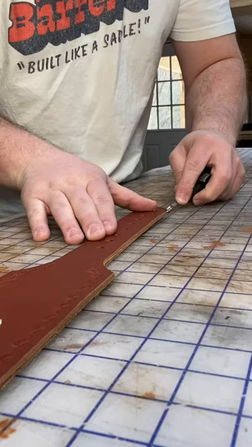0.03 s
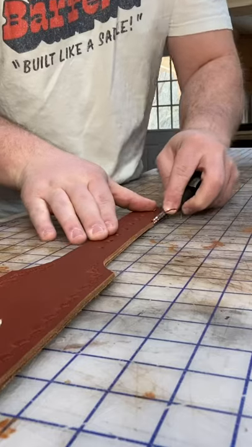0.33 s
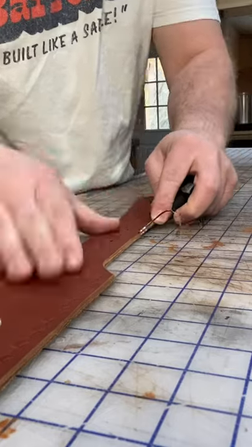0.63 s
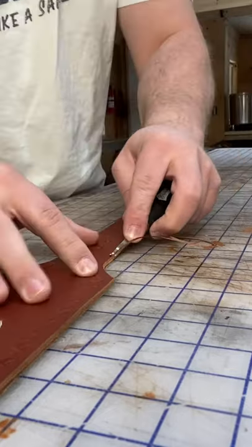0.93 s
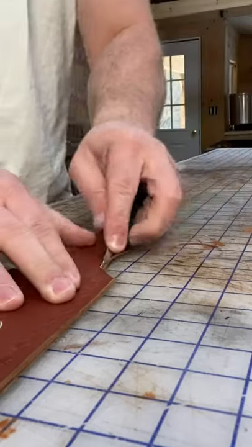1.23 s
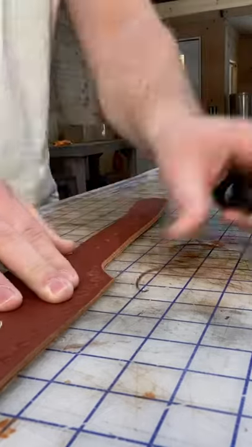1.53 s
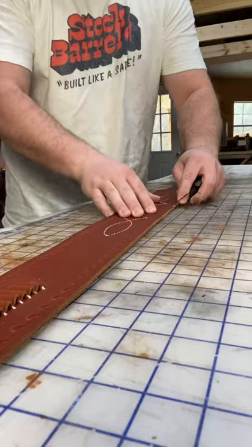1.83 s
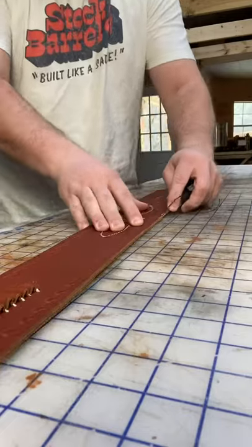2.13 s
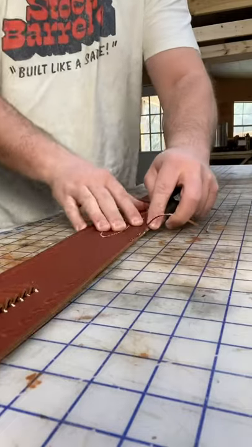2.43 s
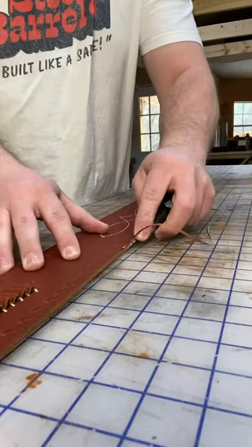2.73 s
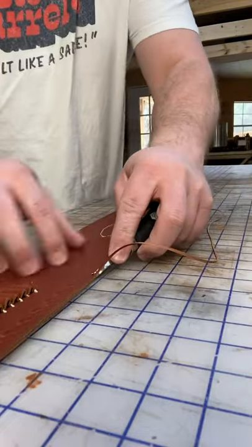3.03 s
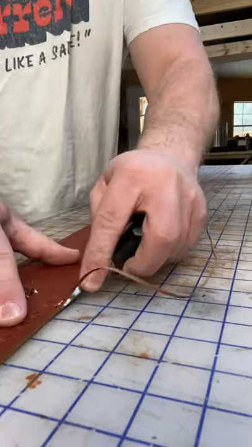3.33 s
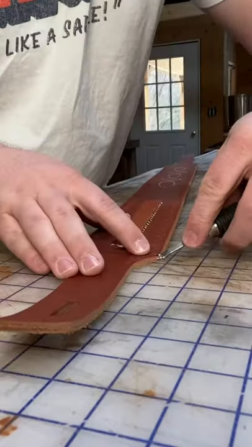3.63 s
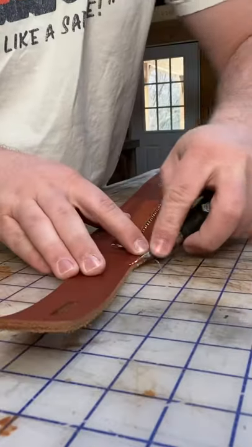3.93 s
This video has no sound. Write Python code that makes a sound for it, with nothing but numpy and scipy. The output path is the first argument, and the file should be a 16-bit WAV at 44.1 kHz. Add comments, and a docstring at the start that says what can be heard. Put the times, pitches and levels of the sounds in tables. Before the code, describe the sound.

A hand tool scrapes along a leather belt's edge in seven dry, hissy strokes. Two run until 1.3 seconds, followed by a sharp tick and a quick brush over leather at 1.6. Five more follow from 1.7 to 4, loudest between 2.5 and 3.5. Soft workbench thuds come around 0.6, 1.4 and from 2 to 3.1 seconds. A low machine hum and faint rush of air lie underneath.

```python
"""Over a low machine hum comes the rasp of an edge beveler, pushed along a leather belt in seven strokes.
The blade parts the fibres in tiny slips, which sound as a rasp with a fine hiss on top and a low rumble
from the workbench. Short pauses to regrip separate the strokes. Hands and tool thud on the bench and
excite its modes, the steel tip ticks, and something brushes quickly over the leather."""
import sys
import numpy as np
from scipy import signal
from scipy.fft import rfft, irfft
from scipy.io import wavfile
from scipy.ndimage import uniform_filter1d

SR = 44100
rng = np.random.default_rng(int(sys.argv[2]) if len(sys.argv) > 2 else 0)


def digitize_waveform(pressure):
    """Quantize a signal to 16-bit integers and store it at the path in sys.argv[1].

    Rows of a 2-D input are taken as channels; values are limited to [-1, 1].
    """
    field = np.atleast_2d(pressure).T
    bounded = np.clip(field, -1, 1)
    quanta = np.round(bounded * 32767).astype(np.int16)
    wavfile.write(sys.argv[1], SR, quanta)


N = 176400
T = np.arange(N) / SR
HZ = np.fft.rfftfreq(N, 1 / SR)

# The envelopes of the seven strokes. Each row: time in seconds, then low rasp, high rasp and hiss in dB.
LEVELS_1 = [(0.04, -54.5, -63.5, -68), (0.268, -53.5, -52.5, -53.5), (0.452, -52.5, -55, -54),
            (0.495, -68, -70, -69), (0.555, -73, -71.5, -63.5), (0.622, -69, -67.5, -73)]
LEVELS_2 = [(0.63, -59, -65.5, -63.5), (0.694, -50.5, -51.5, -51.5), (0.762, -52, -56.5, -51.5),
            (1.035, -52, -58.5, -60), (1.115, -58, -68.5, -69.5), (1.215, -51, -66.5, -67.5),
            (1.346, -47.5, -53, -54)]
LEVELS_3 = [(1.711, -53, -52.5, -56), (1.92, -54, -52.5, -56), (1.965, -63.5, -65.5, -66),
            (2.04, -68, -70, -66)]
LEVELS_4 = [(2.04, -63, -71, -69), (2.078, -52, -53, -55), (2.27, -52.5, -55, -51),
            (2.345, -48, -48.5, -48.5), (2.405, -47.5, -53, -50.5), (2.428, -66.5, -64, -65.5),
            (2.54, -69, -70, -67)]
LEVELS_5 = [(2.545, -58, -77, -77), (2.568, -49, -58.5, -55), (2.61, -48, -52, -47),
            (2.82, -46, -51.5, -51), (2.935, -44, -51, -42.5), (2.975, -61.5, -69, -70),
            (3.072, -97, -77, -65)]
LEVELS_6 = [(3.08, -60, -73, -62), (3.106, -59, -72, -68), (3.12, -47, -60, -57), (3.185, -45, -51, -43.5),
            (3.35, -45.5, -53, -48.5), (3.496, -46, -52, -49)]
LEVELS_7 = [(3.62, -76, -96, -101), (3.645, -56, -66.5, -63), (3.694, -56.5, -59.5, -60.5),
            (3.728, -66, -79, -94), (3.75, -54, -61, -59), (3.84, -53.5, -59, -51.5), (4.0, -52, -60, -59)]


def amp(db):
    """Amplitude ratio of a level in decibels."""
    return 10 ** (np.asarray(db) / 20)


def unit(x):
    """Normalisation to an rms of 1."""
    return x / np.sqrt(np.mean(x ** 2) + 1e-20)


def response(points):
    """Frequency response in dB, interpolated between points on a logarithmic frequency axis."""
    hz, db = np.transpose(points)
    return np.interp(np.log(HZ + 1), np.log(hz), db)


def colour(x, points):
    """Linear filtering: the spectrum is multiplied by a frequency response."""
    return irfft(rfft(x) * amp(response(points)), N)


def drift(shape, *spans):
    """Slow random fluctuation of rms 1: noise averaged over a span of steps along each axis."""
    x = rng.standard_normal(shape)
    for axis, span in enumerate(spans):
        for _ in range(2):
            x = uniform_filter1d(x, max(1, round(span)), axis, mode="wrap")
    return unit(x)


def widen(pair):
    """Partial coherence: independent mid and side signals make left and right differ in the treble."""
    # Each row: frequency in Hz, side relative to mid in dB.
    width = [(100, -49), (300, -20.5), (1200, -26.5), (2200, -19), (3300, -6.5), (5000, -3.5), (7000, -4),
             (9500, -7), (12000, -26), (15500, -58)]
    side = colour(pair[1], width)
    return np.array([pair[0] + side, pair[0] - side])


def machine_hum(waver_depth=.17, waver_s=.05, beat_ratio=1.14, beat_db=-11):
    """Beating: the fundamental of a wavering harmonic series interferes with a weaker tone just above."""
    # Each row: start and end in seconds, fundamental in Hz, level in dB.
    hums = [(.035, 1.707, 89, -58), (1.707, 3.497, 109.1, -57.5), (3.497, 4.0, 89, -58)]
    # Each row: harmonic number, relative level in dB.
    harmonics = [(1, 0.5), (2, -6.5), (4, -10.5), (5, -10.5), (6, -7), (7, -9.5), (9, -15)]
    out = np.zeros(N)
    for ratio, partial_db in harmonics + [(beat_ratio, beat_db)]:
        waver = 1 + waver_depth * (drift(N, waver_s * SR) + 1j * drift(N, waver_s * SR))
        for start, end, hz, db in hums:
            on = (T >= start) & (T < end)
            tone = np.exp(2j * np.pi * (ratio * hz * T[on] + rng.random()))
            out[on] += amp(db + partial_db) * np.sqrt(2) * (waver[on] * tone).real
    return out


def air(level_db=-58.5):
    """Stationary noise: a soft rush of air with most of its power at low frequencies."""
    # Each row: frequency in Hz, relative spectral density in dB.
    spectrum = [(25, -49), (50, -19), (75, -16.5), (110, 2.5), (170, -2.5), (300, -6.5), (550, -7.5),
                (800, -9.5), (1300, -17.5), (2500, -29), (5000, -43), (15000, -45)]
    return amp(level_db) * unit(colour(widen(rng.standard_normal((2, N))), spectrum))


def friction(slips_per_s=2600, slip_spread_db=-0.5, rub_share=0.89):
    """Stick-slip friction: fibres snap in a dense random train over the noise of smooth rubbing."""
    sizes = amp(slip_spread_db * np.minimum(rng.exponential(1, (2, N)), 5))
    slips = sizes * rng.choice([-1, 1], (2, N)) * (rng.random((2, N)) < slips_per_s / SR)
    rubbing = rng.standard_normal((2, N))
    drive = np.sqrt(1 - rub_share) * unit(slips) + np.sqrt(rub_share) * unit(rubbing)
    hz, t, frames = signal.stft(widen(drive), SR, nperseg=1024, noverlap=768)
    bin_hz, hop_s = hz[1], t[1]
    # Broad patches and narrow ripples of colour come and go, and the level flutters.
    patches_db = 1.7 * drift(frames.shape[1:], 900 / bin_hz, .06 / hop_s)
    ripples_db = 2.6 * drift(frames.shape[1:], 180 / bin_hz, .045 / hop_s)
    flutter_db = .6 * drift(len(t), .015 / hop_s)
    frames = frames * amp(patches_db + ripples_db + flutter_db)
    return signal.istft(frames, SR, nperseg=1024, noverlap=768)[1][:, :N]


def gliding_resonance(x, hz, width_hz=420, gain_db=3.5, lag_rad=.8):
    """Interference: a lagging resonance added to its input lifts what lies below hz and hollows above."""
    carrier = np.exp(2j * np.pi * np.cumsum(hz) / SR)
    pole = np.exp(-np.pi * width_hz / SR)
    baseband = signal.lfilter([1 - pole], [1, -pole], x / carrier)
    return x + amp(gain_db) * 2 * (carrier * np.exp(-1j * lag_rad) * baseband).real


def stroke(drive, levels, rumble_db, from_hz, to_hz, resonances, edge_s=0.005):
    """Forced vibration: friction drives tool and bench, and one resonance sinks as the blade travels."""
    # Each row: frequency in Hz, gain in dB before each band is set to its level.
    scrape = [(60, -45), (130, -5.5), (210, 4.5), (330, -3.5), (420, 1.5), (750, -9.5), (1300, -9),
              (2300, -14), (3000, -12.5), (4500, -16), (6500, -19), (8300, -19), (11000, -18.5),
              (15500, -18)]
    # The boundaries in Hz between rumble, low rasp, high rasp and hiss.
    splits_hz = [600, 2700, 8000]
    times, low, high, hiss = np.transpose(levels)
    drive = gliding_resonance(drive, np.interp(T, [times[0], times[-1]], [from_hz, to_hz]))
    peaks_db = sum(db / (1 + (2 * (HZ - hz) / width) ** 2) for hz, width, db in resonances)
    spectrum = rfft(drive) * amp(response(scrape) + peaks_db)
    band = np.searchsorted(splits_hz, HZ)
    contact = np.clip(np.minimum(T - times[0], times[-1] - T) / edge_s + 1, 0, 1)
    on, out = contact > 0, np.zeros((2, N))
    for k, db in enumerate([low + rumble_db, low, high, hiss]):
        part = irfft(spectrum * (band == k), N)[:, on]
        out[:, on] += part / part.mean(0).std() * amp(np.interp(T[on], times, db))
    return out * contact


def beveler(drive):
    """Source and filter: seven pushes of the blade each shape the friction with their own resonances."""
    # Each row: envelope table, bench rumble relative to the low rasp in dB, start and end of the sinking
    # resonance in Hz, steady peaks and dips (each a centre in Hz, a width in Hz and a gain in dB).
    strokes = [ (LEVELS_1, -4, 2700, 1800, [(3500, 1200, 4), (7200, 1800, 5), (11200, 1500, 3)]),
               (LEVELS_2, -1, 2350, 1950, [(620, 100, 4), (2150, 400, 1), (3800, 1000, 4), (6200, 1500, 3),
               (10500, 3000, 6)]), (LEVELS_3, -6, 2800, 2400, [(4200, 600, 7), (5150, 500, 6),
               (7750, 1200, 10), (9300, 600, 6)]), (LEVELS_4, -3, 2500, 1900, [(650, 60, 2), (7600, 900, 4),
               (5000, 900, 6), (9300, 600, 4), (14300, 2500, 3)]), (LEVELS_5, -5, 3200, 2000, [(220, 60, 4),
               (657, 35, 4), (1560, 50, 5), (2510, 200, 5), (4900, 300, 4), (7600, 1500, -2),
               (9700, 1000, 3), (13800, 2500, 5)]), (LEVELS_6, -6, 2650, 1500, [(200, 60, 4), (820, 90, 4),
               (1120, 50, 4), (2150, 300, 2), (2900, 700, -3), (6900, 1200, -4), (9540, 1100, 6),
               (13000, 4000, 3)]), (LEVELS_7, 4, 2350, 2100, [(250, 50, 4), (2350, 1000, -9),
               (3400, 900, 7), (6000, 2200, -6), (11700, 1500, 6)])]
    return sum(stroke(drive, *row) for row in strokes)


def thud(start, db, centre_hz, octaves, t60, rise_s=.002, low_cut_hz=140):
    """Modal vibration: a soft blow rings the bench modes near its centre frequency, and they decay."""
    # Each row: mode frequency in Hz, relative level in dB.
    bench_modes = [(175, 6.5), (205, 1), (245, 8), (335, 1.5), (385, -2), (462, 9), (640, 6), (790, 9),
                   (1010, -13)]
    hz, mode_db = np.transpose(bench_modes)
    weight = amp(mode_db) / (1 + (np.log2(hz / centre_hz) / octaves) ** 2) ** 2
    t = np.maximum(T - start, 0)
    on, out = (t > 0) & (t < 2 * t60), np.zeros(N)
    ring = weight @ np.sin(2 * np.pi * hz[:, None] * t[on]) / np.linalg.norm(weight)
    out[on] = ring * (1 - np.exp(-t[on] / rise_s)) * np.exp(-np.log(1000) * t[on] / t60)
    low_cut = signal.butter(4, low_cut_hz, "high", fs=SR, output="sos")
    return amp(db) * signal.sosfilt(low_cut, out)


def bench_thuds():
    """Impact excitation: hands and tool strike the bench."""
    # Each row: start in seconds, gain in dB, centre in Hz, spread in octaves, 60 dB decay in seconds.
    blows = [(.621, -24.5, 324, 0.24, 0.055), (0.624, -33.5, 188, 0.2, 0.13), (1.361, -29, 363, 0.6, 0.05),
             (1.367, -33.5, 195, 0.51, 0.12), (2.013, -32, 307, 0.36, 0.074),
             (2.049, -23.5, 447, 1.06, 0.022), (2.058, -21, 262, 0.37, 0.061),
             (2.239, -21.5, 515, 0.61, 0.025), (2.247, -21, 345, 1.07, 0.066),
             (2.263, -37.5, 333, 1.34, 0.14), (2.524, -36, 685, 1.1, 0.04), (2.527, -28, 220, 0.83, 0.065),
             (2.537, -32, 180, .35, 0.027), (3.078, -35, 300, 0.61, 0.11)]
    return sum(thud(*row) for row in blows)


def room(x, tail_db=-5.5, t60=0.14):
    """Reverberation: diffuse reflections in the workshop add a short, exponentially decaying tail."""
    t = T[:SR // 2]
    tail = rng.standard_normal(len(t)) * np.exp(-np.log(1000) * t / t60) * (t > .005)
    return x + amp(tail_db) * signal.fftconvolve(x, tail / np.linalg.norm(tail))[:N]


def ticks(crack_s=0.0009, tail_db=-13, tail_s=0.025):
    """Broadband transients: the steel tip slips off or meets the edge in a crack with a faint tail."""
    # Each row: start in seconds, level in dB.
    contacts = [(1.359, -31), (1.38, -54), (1.531, -56), (3.08, -53)]
    # Each row: frequency in Hz, relative spectral density in dB.
    spectrum = [(200, 8), (800, 12.5), (1500, 3), (2800, -6.5), (4200, -3), (7000, -10.5), (15000, -27)]
    envelope = np.zeros(N)
    for start, db in contacts:
        t = np.maximum(T - start, 0)
        decay = np.exp(-t / crack_s) + amp(tail_db) * np.exp(-t / tail_s)
        envelope += (T >= start) * amp(db) * decay
    return envelope * unit(colour(widen(rng.standard_normal((2, N))), spectrum))


def brush(drive):
    """Sliding friction: a light, bright swipe over the leather swells and stops."""
    # Each row: time in seconds, level in dB.
    swell = [(1.55, -83), (1.575, -54), (1.60, -46.5), (1.622, -44), (1.64, -57), (1.699, -77)]
    # Each row: frequency in Hz, relative gain in dB.
    spectrum = [(700, 4.5), (1500, -10), (2300, 0), (4500, -3.5), (6500, -4), (7800, -4.5), (10500, 1.5),
                (13000, -4), (15500, -3)]
    times, db = np.transpose(swell)
    envelope = amp(np.interp(T, times, db)) * (T > times[0]) * (T < times[-1])
    return envelope * unit(colour(drive, spectrum))


def scene():
    """Superposition: strokes, reverberant thuds, ticks and brush add to the hum and air of the shop."""
    drive = friction()
    return beveler(drive) + room(bench_thuds()) + ticks() + brush(drive) + machine_hum() + air()


def record(dry, start_s=.035, cutoff_hz=15830):
    """Band limiting: the sound begins after a moment of silence and passes through a low-pass filter."""
    lowpass = signal.firwin(801, cutoff_hz, window=("kaiser", 8), fs=SR)
    return signal.oaconvolve(dry * (T >= start_s), lowpass[None], "same")


dry = scene()
out = record(dry)
digitize_waveform(out)
```